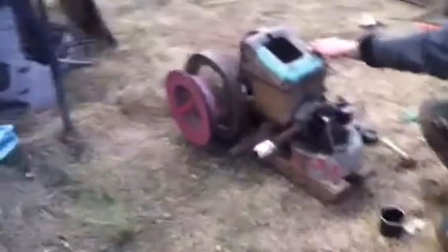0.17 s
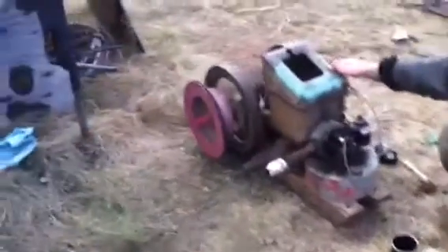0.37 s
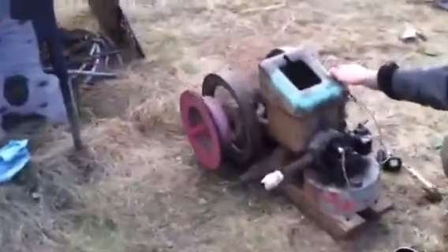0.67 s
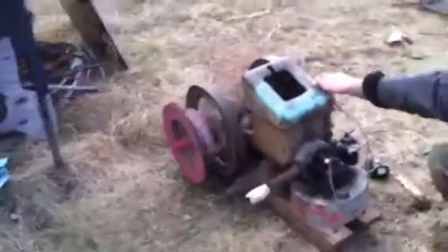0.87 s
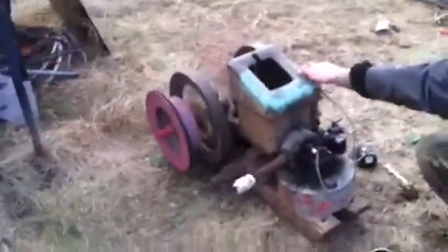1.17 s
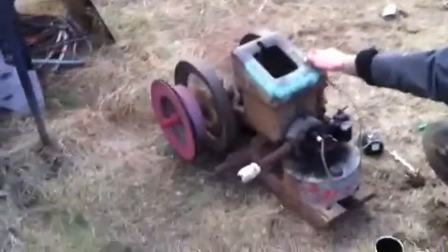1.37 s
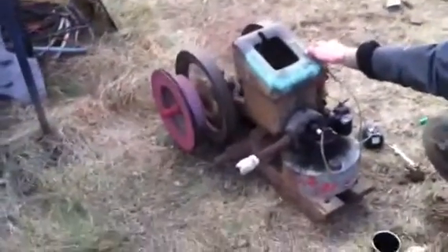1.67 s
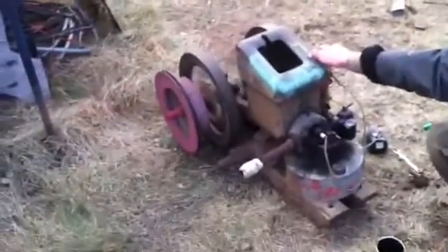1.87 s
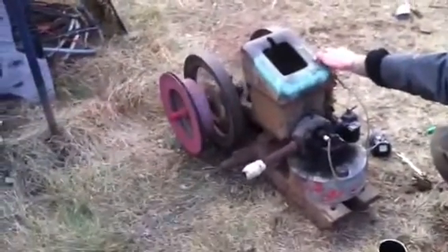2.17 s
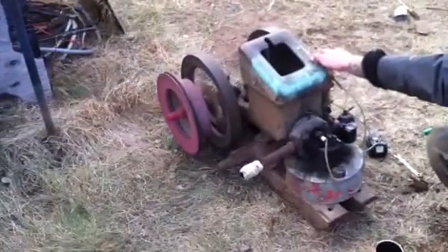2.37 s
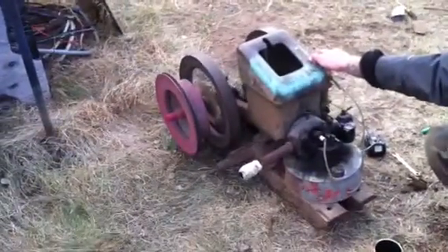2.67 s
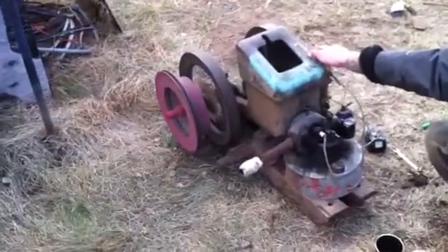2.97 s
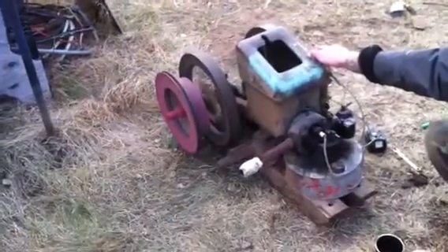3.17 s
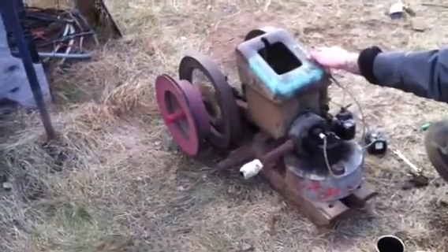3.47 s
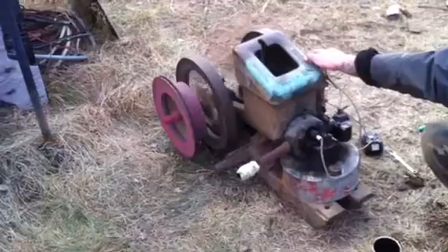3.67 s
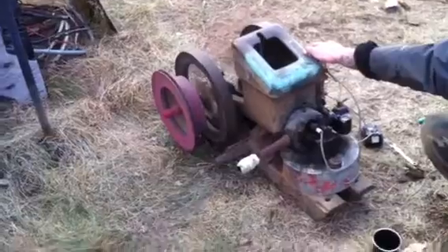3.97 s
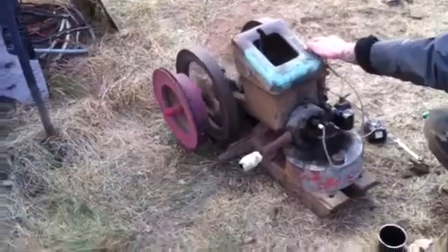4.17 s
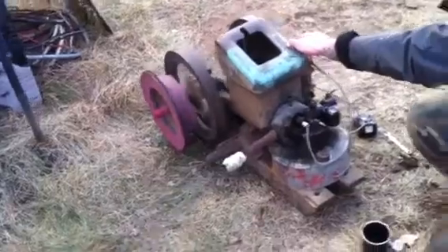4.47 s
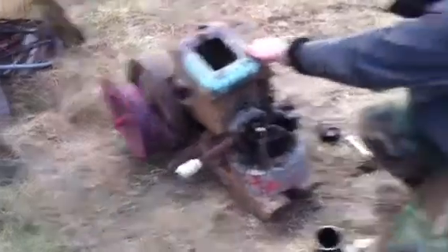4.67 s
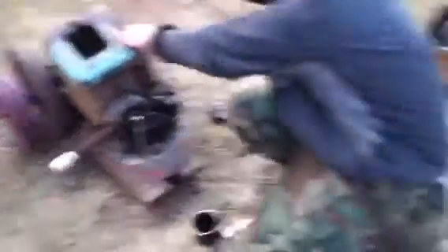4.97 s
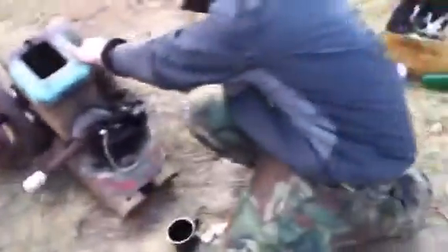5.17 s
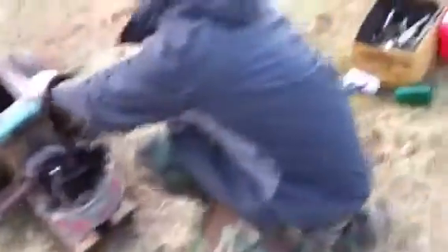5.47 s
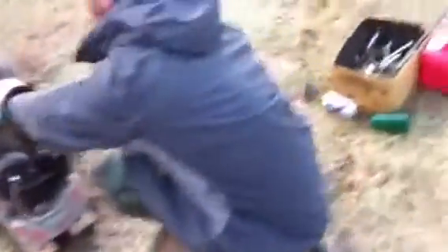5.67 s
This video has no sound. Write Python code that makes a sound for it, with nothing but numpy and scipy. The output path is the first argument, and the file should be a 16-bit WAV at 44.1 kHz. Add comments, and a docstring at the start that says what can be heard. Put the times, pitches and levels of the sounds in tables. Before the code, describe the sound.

Sharp exhaust pops from an old stationary engine, which coasts between firings with quick puffs of air, metal ticks and dull knocks.

```python
"""Hit-and-miss engine idling

An old single-cylinder engine turns five cycles a second, close by outdoors. It fires every second or
third cycle, and the escaping gas cracks sharply. In between it coasts: pumped air hisses, valve gear
ticks and bearings knock. Each crack drives a limiter down, and the clatter swells back behind it."""
import sys
import numpy as np
from scipy import signal
from scipy.fft import rfft, irfft
from scipy.io import wavfile
from scipy.ndimage import uniform_filter1d, minimum_filter1d

SR = 44100
rng = np.random.default_rng(int(sys.argv[2]) if len(sys.argv) > 2 else 0)


def persist_wave(psi):
    """Save psi, clipped to +-1, as 16-bit WAV."""
    counts = np.round(np.clip(psi, -1, 1) * 32767).astype(np.int16)
    wavfile.write(sys.argv[1], SR, np.atleast_2d(counts).T)


N = 255780


def gain_of(db):
    """Amplitude ratio: tenfold for every 20 dB."""
    return 10 ** (np.asarray(db) / 20)


def unit_rms(x):
    """Normalisation to a mean power of one."""
    return x / np.sqrt(np.mean(x ** 2) + 1e-20)


def at_frequency(table, hz):
    """Interpolation on a logarithmic frequency axis."""
    f, value = np.transpose(table)
    return np.interp(np.log(hz + 1), np.log(f + 1), value)


def add(mix, s, sound):
    """Superposition: a sound joins the mix at time s, cut to fit."""
    start = round(s * SR)
    sound = sound[max(-start, 0):]
    part = mix[max(start, 0):][:len(sound)]
    part += sound[:len(part)]


def noise(spectrum):
    """Spectral shaping: white noise takes the given colour, at unit rms."""
    hz = np.fft.rfftfreq(N, 1 / SR)
    return unit_rms(irfft(rfft(rng.standard_normal(N)) * gain_of(at_frequency(spectrum, hz)), N))


def wander(step_s):
    """Slow random variation: Gaussian values joined by straight lines."""
    return np.interp(np.arange(N) / SR / step_s, np.arange(N), rng.standard_normal(N))


def flutter(depth_db, step_s):
    """Random amplitude modulation at unit rms."""
    return unit_rms(gain_of(depth_db * wander(step_s)))


def hump(t, at, width):
    """A Gaussian pulse that peaks at one."""
    return np.exp(-.5 * ((t - at) / width) ** 2)


def ring(modes, t):
    """Free vibration: a sum of damped modes in random phase."""
    return sum(gain_of(db - 60 * t / t60) * np.sin(2 * np.pi * (hz * t + rng.random()))
               for hz, db, t60 in modes)


# crank position: (time [s], four-stroke cycles turned [count])
CRANK = [(0.04, 0), (0.64, 3), (1.044, 5), (1.252, 6), (1.859, 9), (2.258, 11), (2.662, 13), (3.077, 15),
         (3.489, 17), (3.69, 18), (3.869, 19), (4.869, 24), (5.473, 27), (5.868, 29)]

def cycle_times():
    """Rotation sets the rhythm: an intake ends at each whole cycle, and offsets count from there."""
    s, turned = np.transpose(CRANK)
    return np.interp(np.arange(round(turned[-1]) + 1), turned, s)


def each_cycle(shape, scatter_db):
    """Cyclic modulation: an envelope repeats at slightly random levels; overlaps add in power."""
    offsets, db = np.transpose(shape)
    stroke = gain_of(np.interp(np.arange(offsets[0], offsets[-1], 1 / SR), offsets, db))
    power = np.zeros(N)
    for s in cycle_times():
        add(power, s + offsets[0], (stroke * gain_of(scatter_db * rng.standard_normal())) ** 2)
    return np.sqrt(power)


# exhaust hiss through a cycle: (offset [s], level [dB])
EXHAUST_FLOW = [(-.121, -75), (-.114, -34.5), (-.095, -43), (-.078, -32.5), (-.068, -33.5), (-.056, -45.5),
                (0, -49.5), (.03, -49.5), (.075, -63)]
# its spectrum: (frequency [Hz], relative density [dB])
EXHAUST_SPECTRUM = [(50, -68), (200, -30), (600, 4), (1000, 7.5), (1600, 0), (2200, 7), (3300, 4),
                    (5000, 3), (7000, -1.5), (12000, -0.5), (16000, -9)]

def exhaust_air():
    """Turbulent flow: air hisses as the piston pushes it out of the exhaust."""
    hiss = noise(EXHAUST_SPECTRUM)
    return hiss * each_cycle(EXHAUST_FLOW, scatter_db=.5) * flutter(depth_db=2.5, step_s=.0041)


# intake hiss through a cycle: (offset [s], level [dB])
INTAKE_FLOW = [(-.052, -57), (-.045, -37.5), (-.022, -45), (-.003, -40.5), (.005, -55), (.02, -75)]
# its spectrum: (frequency [Hz], relative density [dB])
INTAKE_SPECTRUM = [(100, -59), (800, 7.5), (3000, -19), (3600, -19), (4000, 1.5), (4450, 8), (5000, -7),
                   (5800, 3), (7000, -5), (11000, -8), (16000, -25)]

def intake_air():
    """Flow through a constriction: air drawn through the mixer hisses and whistles."""
    air = noise(INTAKE_SPECTRUM) + throat_whistle()
    return air * each_cycle(INTAKE_FLOW, scatter_db=.8) * flutter(depth_db=.5, step_s=.0014)


# whistle bands of the mixer throat: (frequency [Hz], bandwidth [Hz], level [dB])
THROAT_BANDS = [(3880, 96, -6.5), (4550, 160, -6), (5320, 220, -7.5)]

def throat_whistle():
    """Narrow-band turbulence: a rough whistle whose pitch drifts with the air speed."""
    out = np.zeros(N)
    drift = 1 + .041 * wander(step_s=.03)
    for hz, width, db in THROAT_BANDS:
        eddies = rng.standard_normal(N) + 1j * rng.standard_normal(N)
        envelope = signal.lfilter(*signal.butter(2, width / 2, fs=SR), eddies)
        carrier = np.exp(2j * np.pi * np.cumsum(hz * drift) / SR)
        out += gain_of(db) * unit_rms((envelope * carrier).real)
    return out


# gear noise through a cycle: (offset [s], level [dB])
GEAR_LOAD = [(-.128, -46), (-.112, -38), (-.092, -44), (-.07, -38), (-.04, -43.5), (0, -44.5), (.028, -49),
             (.06, -40), (.074, -47)]
# its spectrum: (frequency [Hz], relative density [dB])
GEAR_SPECTRUM = [(40, -34), (110, -7.5), (170, 10), (310, 10.5), (430, 1.5), (800, -2.5), (1050, 3),
                 (1550, -3.5), (1900, 4), (2500, -4), (4500, -8), (7000, -16), (16000, -21)]

def gears():
    """Friction noise: the gears grind as their load rises and falls."""
    grind = noise(GEAR_SPECTRUM)
    return grind * each_cycle(GEAR_LOAD, scatter_db=.6) * flutter(depth_db=4, step_s=.0042)


# valve gear contacts in every cycle: (offset [s], level [dB])
TICKS = [(-.1035, -30.5), (-.001, -28.5), (0.0109, -34), (0.0135, -29), (.038, -43)]
# their spectrum: (frequency [Hz], relative density [dB])
TICK_SPECTRUM = [(300, 6), (3500, -5.5), (5900, 5.5), (6600, -1.5), (7400, 8.5), (8600, 0.5), (11000, 0.5),
                 (14800, 4.5), (16000, 10.5)]
# modes of the valve spring and rod: (frequency [Hz], level [dB], T60 [s])
SPRING_MODES = [(7370, -6, 0.015), (14830, -30.5, 0.15)]
# the ping swells, then fades as the microphone swings away: (time [s], gain [dB])
PING_GAIN = [(0, 2.5), (2.5, 9.5), (4.3, 3.5), (5.1, -14)]

def valve_gear(snap_s=.00064, snap_db=4, chatter_s=.0054, scatter_db=2):
    """Impact excitation: steel rod and rocker meet with a snap, chatter, and set the spring ringing."""
    t = np.arange(SR // 20) / SR
    clicks, pings = np.zeros((2, N))
    attack = 1 - np.exp(-t / .00015)
    contact = attack * (np.exp(-t / chatter_s) + gain_of(snap_db) * np.exp(-t / snap_s))
    for s in cycle_times():
        ping_db = np.interp(s, *np.transpose(PING_GAIN))
        for offset, db in TICKS:
            late, harder, ringing = rng.standard_normal(3)
            when = s + offset + .0003 * late
            ping = attack * ring(SPRING_MODES, t)
            add(clicks, when, gain_of(db + scatter_db * harder) * contact)
            add(pings, when, gain_of(db + ping_db + scatter_db * ringing) * ping)
    return clicks * noise(TICK_SPECTRUM) + pings


# bearing and piston knocks in every cycle: (offset [s], level [dB], frequency [Hz], time constant [s])
KNOCKS = [(-.119, -27, 290, .009), (-.069, -28, 200, .004), (-.056, -22.5, 245, 0.004),
          (-.0005, -19, 224, 0.0026), (.014, -29, 167, 0.0038), (0.061, -47, 216, 0.0027)]

def bearings(scatter_db=1.5, jitter_s=.0007):
    """Heavily damped impacts: slack in the bearings closes with dull knocks into the skid."""
    t, out = np.arange(SR // 12) / SR, np.zeros(N)
    attack = 1 - np.exp(-t / .0025)
    for s in cycle_times():
        for offset, db, hz, decay in KNOCKS:
            late, harder, detune = rng.standard_normal(3)
            knock = np.sin(2 * np.pi * hz * (1 + .063 * detune) * t) * attack * np.exp(-t / decay)
            add(out, s + offset + jitter_s * late, gain_of(db + scatter_db * harder) * knock)
    return out


# a loose link, struck now and then as the exhaust valve lifts: (time [s], level [dB], frequency [Hz])
CLANKS = [(0.124, -36, 1933), (0.726, -38, 875), (2.343, -34, 1800), (2.757, -32.5, 900),
          (3.159, -34, 1005), (4.354, -34.5, 1950), (5.161, -34, 1710), (5.751, -43, 1690)]
IGNITION_LEAD_S, IGNITION_DB, IGNITION_HZ = .03, -41, 1138  # piston jolt ahead of each crack

def clanks(rattle_db=-3, part_db=2, frame_db=9, decay_s=.0049):
    """Structure-borne sound: the link, or the piston at ignition, rattles, rings and shakes the frame."""
    t = np.arange(SR // 12) / SR
    rattle, iron = np.zeros((2, N))
    envelope = t / decay_s * np.exp(1 - t / decay_s)
    ignitions = [(s - IGNITION_LEAD_S, IGNITION_DB, IGNITION_HZ) for s, *_ in FIRINGS]
    for s, db, hz in CLANKS + ignitions:
        add(rattle, s, gain_of(db + rattle_db) * hump(t, at=.0029, width=.0043))
        add(iron, s, gain_of(db + part_db) * envelope * np.sin(2 * np.pi * hz * t) / 2)
        add(iron, s + .00191, gain_of(db + frame_db) * frame_ring())
    return rattling(rattle) + iron


# spectrum of the rattle: (frequency [Hz], relative density [dB])
RATTLE_SPECTRUM = [(100, -19), (300, 12), (550, 2), (1100, 19), (1600, 17), (2300, 14.5), (3500, 14),
                   (7000, -23), (16000, -3)]

def rattling(envelope):
    """Contact noise: loose metal gives a broadband burst."""
    return envelope * noise(RATTLE_SPECTRUM)


# modes of the cast-iron hopper and frame: (frequency [Hz], level [dB], T60 [s])
FRAME_MODES = [(303, -27.5, 0.21), (910, -32, 0.083), (1280, -39, 0.059), (1940, -22.5, 0.11),
               (2444, -16, 0.053), (2530, -45, 0.05), (3530, -29, 0.051), (4958, -34, 0.02)]

def frame_ring(scatter_db=4):
    """Modal response: each blow on the castings favours different modes."""
    shifts_db = scatter_db * np.clip(rng.standard_normal(len(FRAME_MODES)), -1, 1)
    modes = [(hz, db + shift, t60) for (hz, db, t60), shift in zip(FRAME_MODES, shifts_db)]
    return ring(modes, np.arange(SR // 3) / SR)


# exhaust cracks: (time [s], strength [dB], jet duration [s])
FIRINGS = [(0.327, 2.5, 0.0091), (0.93, 4, 0.0084), (1.341, 1, 0.012), (1.946, 2, 0.01),
           (2.548, -2.5, 0.012), (2.9597, -2.5, 0.01), (3.3756, 0, 0.0093), (3.9577, 1, 0.0096),
           (4.559, -0.5, 0.012), (4.9586, 0, 0.0097), (5.359, -1.5, 0.013)]
# spectra of the pipe's bark and the closing puff: (frequency [Hz], relative density [dB])
BARK_SPECTRUM = [(200, -14), (530, -5), (700, 0), (920, 5), (1400, -2.5), (2200, -26), (4000, 0),
                 (8000, -50), (16000, -45)]
PUFF_SPECTRUM = [(50, 6), (170, 10), (500, -28), (1000, -3), (1400, -2), (2600, 12), (3600, 6), (7000, 3),
                 (11000, 2), (16000, -2)]

def firings(rise_s=.00061, fall_s=.0047, slap_s=.00028, leak_db=-13, slap_db=8):
    """Blowdown: burning gas escapes with a low push and a jet, then the piston puffs out the rest."""
    t = np.arange(-SR // 100, SR // 3) / SR
    jet, push, bark, puff, blows = np.zeros((5, N))
    # gas leaks past the lifting valve just before the jet breaks out
    opening = 1 / (1 + np.exp(-t / rise_s)) + gain_of(leak_db) * hump(t, at=-.0016, width=.00029)
    # the gas column swings out, then surges again as the jet collapses
    swings = hump(t, at=-.0012, width=.0015) + .82 * hump(t, at=.0085, width=.0046)
    # the first pressure front leaves the pipe as one slap
    slap = (1 - (t / slap_s) ** 2) * hump(t, at=0, width=slap_s)
    for s, db, duration in FIRINGS:
        start = s + t[0]
        push_db, bark_db = -18 + 2.44 * db, -17.5 + 1.56 * db  # both grow faster than the jet
        emptying = 1 / np.sqrt(1 + np.exp(np.minimum(2 * (t - duration) / fall_s, 80)))
        add(jet, start, gain_of(db) * opening * emptying)
        add(push, start, gain_of(push_db) * swings)
        add(bark, start, gain_of(bark_db) * swings)
        add(puff, start, gain_of(db - 16) * hump(t, at=.0307, width=.0033))
        add(blows, start, -gain_of(bark_db + slap_db) * slap)
        add(blows, s, gain_of(db) * frame_ring())
    crack = jet * billowing_jet() * flutter(depth_db=1.5, step_s=.0011)
    return crack + push * gas_column() + bark * noise(BARK_SPECTRUM) + puff * noise(PUFF_SPECTRUM) + blows


# spectrum of the exhaust jet: (frequency [Hz], relative density [dB])
JET_SPECTRUM = [(40, -50), (200, 3), (550, -20), (1500, -6.5), (2100, 1.5), (3200, -1), (3700, 2),
                (5000, 2), (7000, -1), (11500, 1.5), (14000, -2.5), (16000, 3.5)]

def billowing_jet(echo_gain=.35, step_s=.05):
    """Comb filtering: the jet wanders, so its echo off the ground colours each crack differently."""
    direct, n = noise(JET_SPECTRUM), np.arange(N)
    lag_s = np.interp(n / SR / step_s, n, rng.uniform(.0002, .0009, N))
    echo = np.interp(n - np.round(SR * lag_s), n, direct)
    return unit_rms(direct + echo_gain * echo)


# spectrum of the low push: (frequency [Hz], relative density [dB])
PUSH_SPECTRUM = [(30, -23), (90, -11), (170, 0.5), (300, -3), (400, -4.5), (550, -39), (1500, -48),
                 (16000, -80)]

def gas_column(hz=215, noise_share=.82):
    """Pipe resonance: the gas in the short pipe swings at a low pitch, roughened by turbulence."""
    tone = unit_rms(np.sin(2 * np.pi * (hz * np.arange(N) / SR + rng.random())))
    return np.sqrt(1 - noise_share) * tone + np.sqrt(noise_share) * noise(PUSH_SPECTRUM)


def near_echoes(x, count=14, echo_db=-22.5):
    """Interference: flywheels, skid and ground reflect within milliseconds and ripple the spectrum."""
    taps = np.zeros(SR // 100)
    taps[0] = 1
    taps[rng.integers(SR // 700, SR // 160, count)] = gain_of(echo_db) * rng.choice([-1, 1], count)
    # bass diffracts round small surfaces
    taps[1:] = signal.lfilter(*signal.butter(1, 700, "high", fs=SR), taps[1:])
    return signal.fftconvolve(x, taps / np.linalg.norm(taps))[:N]


# decay of the scattered sound: (frequency [Hz], T60 [s])
YARD_DECAY = [(150, 0.12), (1000, 0.37), (4000, 0.43), (9000, 0.34), (16000, 0.31)]

def yard_tail(x, echoes_per_s=3000, gap_s=.006):
    """Scattering: ground, posts and clutter return a thin tail, each band dying at its own rate."""
    size = SR // 2
    taps = rng.standard_normal(size) * (rng.random(size) < echoes_per_s / SR)
    taps *= np.arange(size) > gap_s * SR
    hz, t, bands = signal.stft(taps, SR, nperseg=256)
    decay = gain_of(-60 * t / at_frequency(YARD_DECAY, hz)[:, None])
    tail = signal.istft(bands * decay, SR, nperseg=256)[1]
    return signal.fftconvolve(x, tail / np.linalg.norm(tail))[:N]


# spectrum of the outdoor background: (frequency [Hz], relative density [dB])
AMBIENT_SPECTRUM = [(30, 15), (70, -13), (170, 28.5), (300, -26), (500, 10.5), (1000, 10), (2000, 9.5),
                    (4500, 3.5), (7000, -18), (16000, -19)]

def scene():
    """Superposition of the engine, its echoes and a steady outdoor background."""
    direct = firings() + exhaust_air() + intake_air() + gears() + valve_gear() + bearings() + clanks()
    engine = near_echoes(direct)
    return (engine + gain_of(-23.5) * yard_tail(engine) + gain_of(-51) * noise(AMBIENT_SPECTRUM))[None]


def limiter(x, threshold_db=-12, recovery_db_per_s=14, average_s=.029, ahead_s=.0063):
    """Automatic gain control: the gain drops just ahead of each loud peak and recovers steadily."""
    power = uniform_filter1d((x ** 2).mean(0), round(average_s * SR))
    over_db = np.maximum(10 * np.log10(abs(power) + 1e-12) - threshold_db, 0)
    recovered_db = recovery_db_per_s * np.arange(N) / SR
    cut_db = np.maximum.accumulate(over_db + recovered_db) - recovered_db
    ahead = round(ahead_s * SR) + 1
    held_db = minimum_filter1d(-cut_db, 2 * ahead)
    return x * gain_of(uniform_filter1d(held_db, ahead))


def record(dry, ceiling=.98, bass_hz=110, edge_hz=15750):
    """Band limiting and saturation: a small microphone loses deep bass; limited peaks round off."""
    thin = signal.lfilter(*signal.butter(1, bass_hz, "high", fs=SR), dry)
    rounded = ceiling * np.tanh(limiter(thin) / ceiling)
    lowpass = signal.firwin(301, edge_hz, window=("kaiser", 8), fs=SR)
    return signal.oaconvolve(rounded, lowpass[None], "same")


dry = scene()
out = record(dry)
persist_wave(out)
```